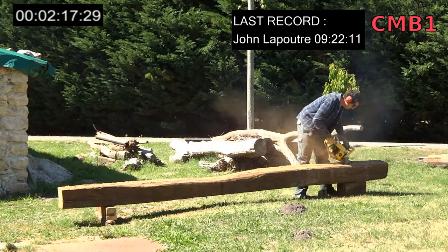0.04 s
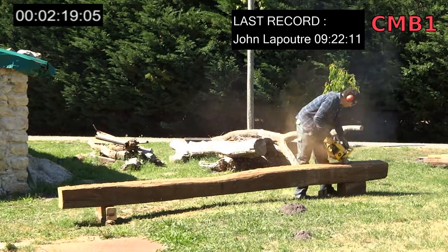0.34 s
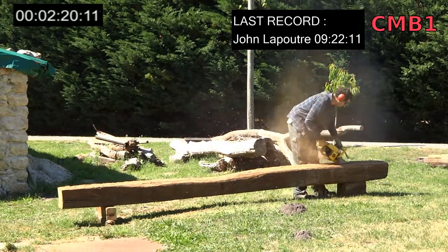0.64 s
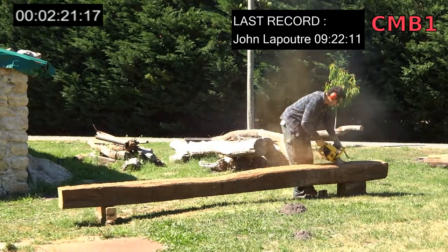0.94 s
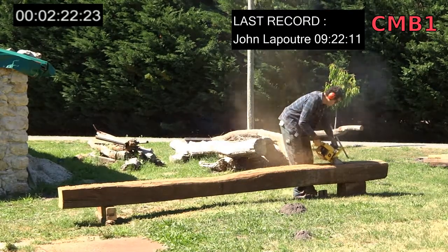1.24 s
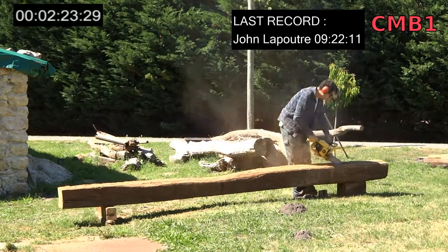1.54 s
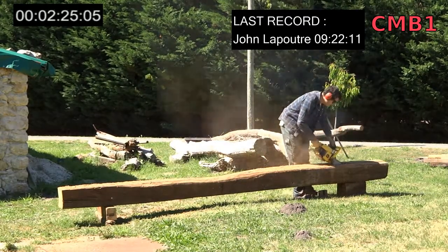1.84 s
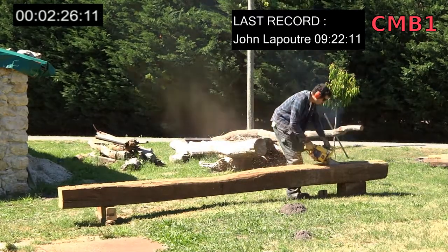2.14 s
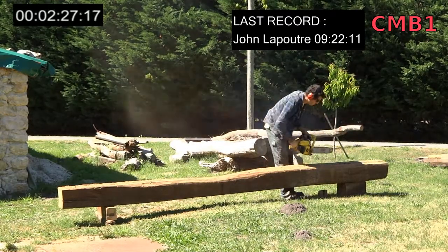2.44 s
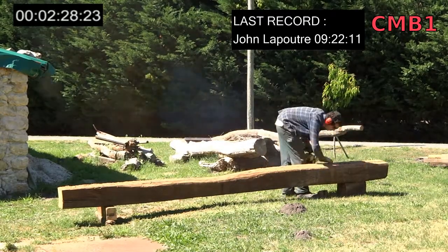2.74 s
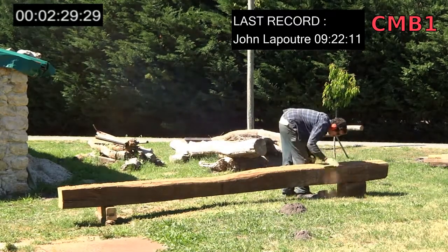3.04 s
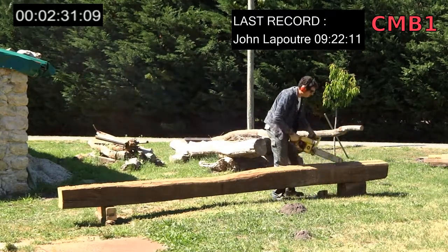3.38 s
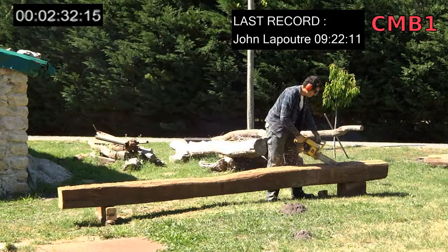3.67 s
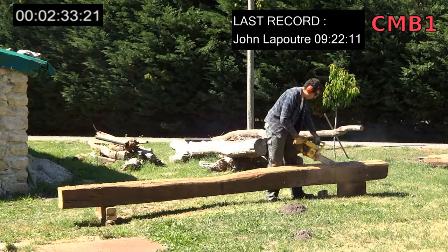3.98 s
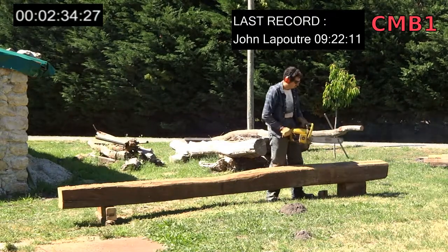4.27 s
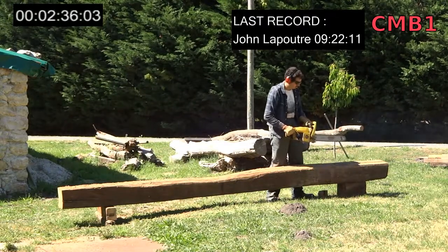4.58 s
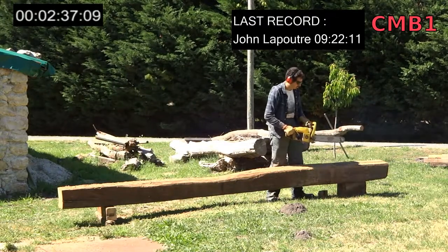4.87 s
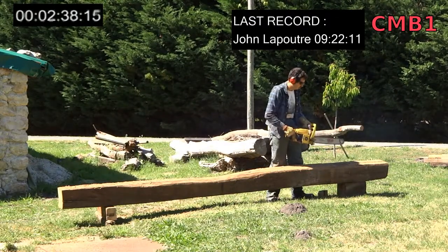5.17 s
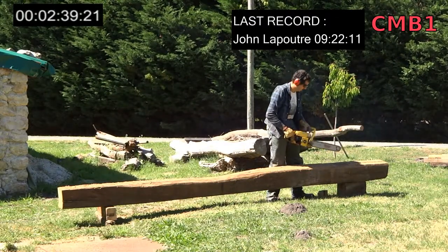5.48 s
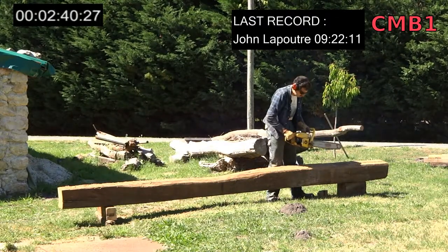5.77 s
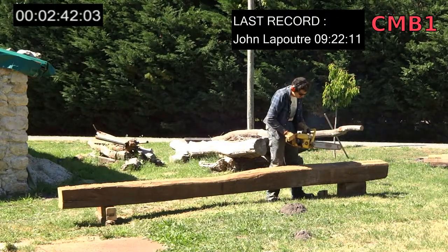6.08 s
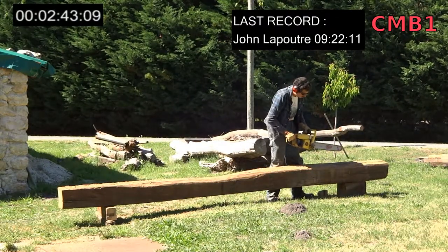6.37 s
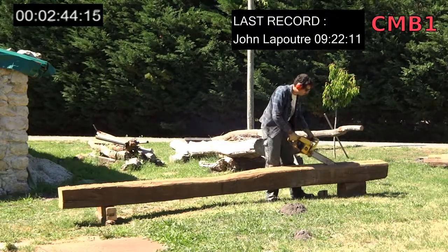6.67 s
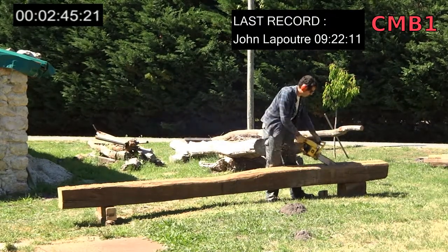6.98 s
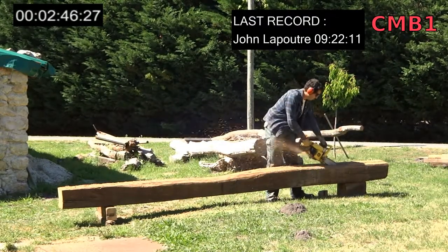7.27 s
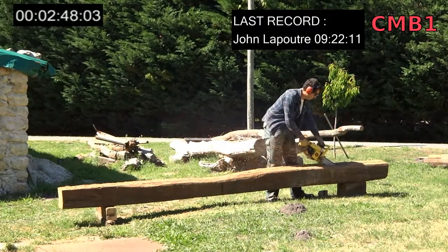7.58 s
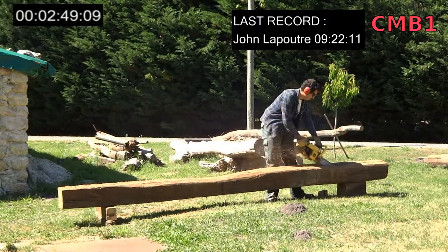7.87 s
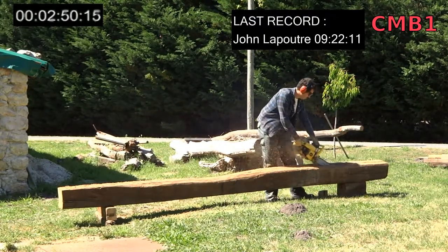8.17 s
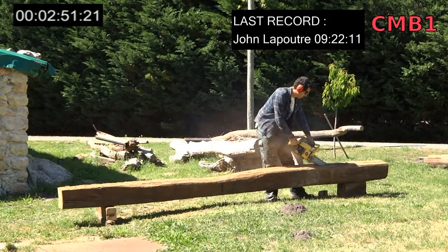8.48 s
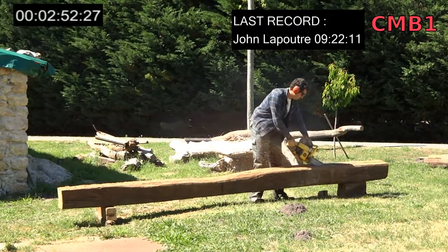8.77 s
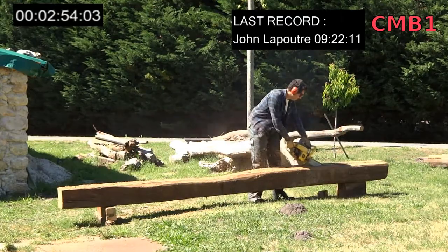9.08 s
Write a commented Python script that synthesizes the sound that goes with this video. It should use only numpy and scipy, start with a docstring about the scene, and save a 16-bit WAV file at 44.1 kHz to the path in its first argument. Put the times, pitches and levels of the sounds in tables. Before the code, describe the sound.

A small two-stroke chainsaw revs straight into a hard, high whine, sags in pitch around 1.3 seconds and climbs to a peak near 1.9. After a quick blip it rings down to a slow, stumbling putter, the chain hissing, rattling and lightly scraping a log. Several short revs come between 3.2 and 3.9 seconds, followed by a few crunching, hollow bites until 4.3. The engine sputters on slowly, blips once at 5 seconds and settles again, with more scraping around 6.5. At 6.8 it opens to full throttle, the whine dipping and rising under load. Deep, tearing bites into the wood cluster from 8.4 to 9.3 seconds, as the engine surges to its highest scream. The saw sits in the centre, outdoors, with a faint short echo and a very quiet low rumble of open air.

```python
"""A small two-stroke chainsaw revs up into a hard whine, then carves a log in blips, crawls and pulls.
One exhaust pulse a turn rings the muffler: under load it fires evenly and whines, at low speed it
stumbles and barks, and running down with the throttle shut it rings. The chain hisses round the bar
and crunches into the wood. Lawn and hedge answer faintly over a low rumble of open air."""
import sys
import numpy as np
from scipy import signal
from scipy.fft import rfft, irfft, next_fast_len
from scipy.io import wavfile
from scipy.ndimage import uniform_filter1d, minimum_filter1d, map_coordinates

SR = 44100
rng = np.random.default_rng(int(sys.argv[2]) if len(sys.argv) > 2 else 0)


def wrap_up_sound(samples):
    """Save the sound to the file named by the first command line argument, as 16-bit audio."""
    columns = np.atleast_2d(samples).T
    # keep every value between -1 and 1, then stretch to whole-number steps
    tamed = np.clip(columns, -1, 1)
    steps = np.round(tamed * 32767).astype(np.int16)
    wavfile.write(sys.argv[1], SR, steps)


N = 411188

# Teeth scraping the wood, as hard as the bar is pressed: t/s, relative level/dB
SCRAPE = [(1.95, -49), (2.4, -39.5), (3.75, -40), (3.95, -31.5), (5.3, -46), (6.55, -29.5), (6.85, -32.5),
          (7.7, -40), (7.85, -28.5)]
# The chain digs in deep: t/s, length/s, relative level/dB
DEEP_BITES = [(3.068, .03, -30.5), (3.896, 0.087, -22), (4.12, 0.05, -27.5), (4.247, 0.07, -23),
              (6.387, 0.16, -30), (7.85, 0.085, -39), (8.001, 0.17, -49), (8.445, 0.12, -19.5),
              (8.612, .068, -16.5), (8.69, 0.086, -28.5), (8.811, 0.041, -28), (8.936, 0.091, -19),
              (9.128, 0.16, -25.5), (9.303, 0.057, -24.5)]
# Colours of the chain and the wood: f/Hz, relative level/dB
HISS_EQ = [(150, -27), (1100, -5), (2500, -15), (3400, -9), (4400, -2.5), (5600, -6), (6900, 0),
           (8800, -4.5), (11300, -6.5), (13300, -2), (16000, -14)]
RATTLE_EQ = [(2000, -25), (4500, -2), (6500, -2), (7600, -18), (9000, -16), (9800, 1), (10800, -3),
             (12500, -20)]
CHIP_EQ = [(90, -36), (550, -3.5), (1400, -1), (2600, -7.5), (16000, -24)]
LOG_EQ = [(40, -36), (220, -7.5), (650, -1.5), (4000, -33)]
# Colours of the exhaust voices: f/Hz, relative level/dB
GROWL_EQ = [(100, -32), (400, -1.5), (1000, -17.5), (1520, 17), (1900, 3), (2350, 6), (3200, -25.5),
            (16000, -58)]
RING_EQ = [(150, -53), (800, 3), (1900, -2), (2700, -5), (4200, 7.5), (5600, 0), (8200, -11.5),
           (10000, -14), (16000, -27)]
CRACK_EQ = [(300, -64), (1980, -7.5), (2350, -1.5), (3400, 2), (4250, -1), (6700, -7.5), (7700, -31.5)]
BARK_EQ = [(100, -94), (300, -19.5), (600, -5.5), (1080, -2), (1500, 1), (1900, -11), (2400, -2),
           (3500, -15), (16000, -70)]
PUFF_EQ = [(100, -74), (240, -12.5), (480, -10.5), (720, 4.5), (950, 0.5), (2500, -42)]
YELP_EQ = [(100, -50), (550, 17), (1100, 17), (1550, 25.5), (2050, 22), (2800, -16), (4300, -21),
           (6200, 14.5), (16000, -80)]
WHINE_EQ = [(170, -40), (350, -0.5), (600, 6), (800, 1.5), (1400, 5), (1850, 3), (2450, -9), (2850, -0.5),
            (3350, -3), (4100, 6), (4700, 3.5), (5400, 4), (7200, -3.5), (8100, -4.5), (8900, -21.5),
            (10500, -29), (16000, -20)]
# Crank speed in two full-throttle pulls, sagging as the bar is pressed in: t/s, f/Hz
OPENING_PULL = [(.02, 316), (.075, 480), (.14, 572), (.42, 583), (.48, 648), (.58, 590), (.7, 532),
                (.81, 463), (.89, 466), (1.04, 424), (1.19, 376), (1.28, 365), (1.38, 351), (1.47, 384),
                (1.59, 458), (1.705, 432), (1.8, 578), (1.858, 660)]
CLOSING_PULL = [(6.748, 240.3), (6.778, 261.1), (6.812, 266.4), (6.96, 531.4), (7.056, 630.8), (7.097, 592),
                (7.18, 617.5), (7.42, 408.5), (7.53, 451), (7.67, 458.5), (7.82, 381.3), (7.99, 354.1),
                (8.221, 408.2), (8.32, 393), (8.41, 460.4), (8.565, 421.7), (8.706, 545.7), (8.82, 422.2),
                (8.935, 360.8), (9.228, 717.5), (9.324, 684)]
# Crank speed in three slow crawls off the throttle, a list for each: t/s, f/Hz
SLOW_CRAWLS = [
    [(2.27, 225.8), (2.599, 233.0), (2.87, 255.1), (3.24, 268.2)],
    [(3.952, 230.5), (4.996, 231.3)],
    [(5.17, 328), (5.3, 289), (5.45, 254), (5.7, 242), (6.0, 245), (6.6, 243), (6.72, 233)],
]
# Throttle blips: start t/s, end t/s, from f/Hz, to f/Hz, bend (above 0 = fast at first), opening 0-1
THROTTLE_BLIPS = [(1.936, 2.123, 286.6, 528.4, -1.5, 0.97), (3.241, 3.268, 263.9, 330.7, 0.18, 0.67),
                  (3.355, 3.422, 320, 340.3, 5.5, 0), (3.481, 3.575, 264.9, 471.3, -0.42, 0.87),
                  (3.618, 3.854, 324.2, 481, 2.5, 1), (5.0, 5.073, 243.9, 408, -2.5, 0.93)]
# How far the exhaust is turned away: t/s, share 0-1
EXHAUST_AWAY = [(1.9, 0.06), (2.68, 0.2), (2.78, 0.68), (3.12, 0.99), (3.2, 0.08), (3.95, 0.27),
                (4.35, 0.09)]

COAST_S, THROTTLE_S = .1, .019  # time constant of the run-down; travel time of the throttle
WAVER, FLUTTER, LOAD_WAVER = .0022, .003, .003  # speed drift as shares: slow, fast, under load
CATCH_HZ, CATCH_WIDTH_HZ = 288, 83  # throttle open: yelp below this speed, whine above
STUMBLE_HZ, STUMBLE_WIDTH_HZ = 325, 27  # the engine stumbles below this speed
STRAY_HZ, STRAY_DB = 352, -2.5  # stray firings still bark up to this speed
RING_HZ, RING_WIDTH_HZ = 296, 4.2  # running down, the muffler rings until this speed
REFIRE_S = .021  # running down, firing picks up this late
LUG_HZ, LUG_JITTER_S, LUG_POWER = 360, 1.2e-5, 2.5  # the whine's timing scatter shrinks above this speed
SCREAM_HZ, SCREAM_WIDTH_HZ, SCREAM_DB = 520, 360, -3  # orders 7 and 9 scream above this speed
HOUSING_HZ, HOUSING_WIDTH_HZ, HOUSING_DB = 4200, 330, 5.5  # resonance of the housing
TEAR_HZ, TEAR_WIDTH_HZ = 310, 22  # above this speed a bite tears more than it thumps
# Faders, then their trims with the exhaust turned fully away or the throttle open
WHINE_DB, YELP_DB, RING_DB, BARK_DB, CRACK_DB = -20, -25.5, -19, -24, -19.5
GROWL_DB, SING_DB, CHAIN_DB, RATTLE_DB = -23, -38, -30.5, -34
AWAY_CRACK_DB, AWAY_CHAIN_DB, AWAY_SING_DB, OPEN_CRACK_DB = -30.5, -3, -10, -6.5
INPUT_DB, CEILING, HOLD_S, EASE_S, TOP_HZ = 1.5, .55, .009, .02, 15850  # limiter and high cut


def amp(db):
    """Decibels as a gain."""
    return 10 ** (np.asarray(db) / 20)


def unit(x):
    """x at rms 1."""
    return x / np.sqrt(np.mean(x ** 2) + 1e-20)


def curve(rows):
    """Breakpoints (t/s, value) as one value per sample."""
    return np.interp(np.arange(N) / SR, *np.transpose(rows))


def wobble(rate):
    """Smooth random modulation, rate knots a second."""
    knots = rng.standard_normal(int(N * rate / SR) + 4)
    return map_coordinates(knots, [np.arange(N) * rate / SR], order=2)


def swell(centre_s, length_s):
    """An envelope with a sharp rise, a flat top and a softer fall."""
    u = 2 * (np.arange(N) / SR - centre_s) / length_s
    return np.exp(-.5 * np.where(u < 0, (u * u) ** 6, (u * u) ** 2))


def glide(rows, t):
    """A smooth line through (t/s, value) rows that levels off at each turning point."""
    s, v = np.transpose(sorted(map(tuple, rows)))
    rate = np.pad(np.diff(v) / (np.diff(s) + 1e-9), 1, mode="edge")
    slope = 2 * np.maximum(rate[:-1] * rate[1:], 0) / (rate[:-1] + rate[1:] + 1e-9)
    k = np.clip(np.searchsorted(s, t) - 1, 0, len(s) - 2)
    step = s[k + 1] - s[k] + 1e-9
    u = np.clip((t - s[k]) / step, 0, 1)
    ease = u * u * (1 + 2 * (1 - u))
    bow = step * u * (1 - u) * ((1 - u) * slope[k] - u * slope[k + 1])
    return v[k] + (v[k + 1] - v[k]) * ease + bow


def approach(t, start, end, first, last, bend):
    """An exponential run from first to last between two times."""
    u = np.clip((t - start) / (end - start), 0, 1)
    return first + (last - first) * np.expm1(-bend * u) / np.expm1(-bend)


def crossfade(speed, centre_hz, width_hz):
    """Equal-power gains for what sounds below and above a speed."""
    above = .5 + .5 * np.tanh((speed - centre_hz) / (2 * width_hz))
    return np.sqrt(1 - above), np.sqrt(above)


def coloured(x, eq, size=4096):
    """x through a minimum-phase EQ of unit energy, drawn as (f/Hz, level/dB) points."""
    hz, db = np.transpose(eq)
    grid = np.fft.rfftfreq(size, 1 / SR)
    response = amp(np.interp(np.log(grid + 1), np.log(hz), db))
    cepstrum = irfft(np.log(response))
    cepstrum[1:size // 2] *= 2
    cepstrum[size // 2 + 1:] = 0
    ring = irfft(np.exp(rfft(cepstrum)))
    return signal.oaconvolve(x, ring / np.linalg.norm(ring))[:N]


def pulses(times, sizes, count=8):
    """Band-limited impulses at times (s) that fall between samples."""
    at = times[:, None] * SR
    taps = np.floor(at).astype(int) + np.arange(1 - count, count + 1)
    shape = np.sinc(taps - at) * np.cos(np.pi * (taps - at) / (2 * count)) ** 2
    return np.bincount(np.clip(taps, 0, N).ravel(), (shape * sizes[:, None]).ravel(), N + 1)[:N]


def breeze():
    """A faint stereo bed of open-air rumble, growing slowly."""
    level = amp(np.linspace(-71, -60, N) + 4 * wobble(8.5))
    shared, left, right = [coloured(rng.standard_normal(N), [(75, 2), (300, -69)]) for _ in range(3)]
    return level * (shared + np.array([left, right]))


def hedge_echo(x, t60):
    """Ground and hedge scatter the sound into a short, diffuse tail."""
    t = np.arange(SR // 2) / SR
    tail = rng.standard_normal(len(t)) * amp(-60 * t / t60)
    return signal.oaconvolve(x, tail / np.linalg.norm(tail))[:N]


def off_the_log(x, throttle, share, path_s):
    """x plus its bounce off the log: the path shifts as the saw sweeps, flanging the harmonics."""
    n = np.arange(N)
    sweep = .16 * throttle * wobble(10) + .012 * wobble(5)
    return x + share * np.interp(n - SR * path_s * (1 + sweep), n, x)


def chain_rattle(turns, throttle, away):
    """Off the throttle, the slack chain slaps the bar in time with the crank."""
    level = amp(RATTLE_DB - 11 * away + 1.8 * wobble(11)) * (1 - throttle)
    slap = 1 + .37 * np.cos(2 * np.pi * turns)
    return level * slap * coloured(rng.standard_normal(N), RATTLE_EQ)


def chain_hiss(turns, away, width):
    """Links hiss along the bar in stereo, throbbing a little with the crank."""
    level = amp(CHAIN_DB + AWAY_CHAIN_DB * away + 2.3 * wobble(14))
    throb = 1 + .13 * np.cos(2 * np.pi * turns)
    mid, side = [level * throb * coloured(rng.standard_normal(N), HISS_EQ) for _ in range(2)]
    return np.array([mid + width * side, mid - width * side])


def chips(eq, spike_db, per_second=3500):
    """Teeth tear off chips at random: dense clicks of very uneven size."""
    clicks = (rng.random(N) < per_second / SR) * rng.standard_normal(N)
    return unit(coloured(clicks * amp(spike_db * wobble(160)), eq))


def cutting(speed):
    """A running scrape with deep bites: a slow chain thumps the log, a fast one tears it."""
    slow, fast = crossfade(speed, TEAR_HZ, TEAR_WIDTH_HZ)
    scrape = amp(curve(SCRAPE))
    bite = np.sqrt(sum((amp(db) * swell(s, length)) ** 2 for s, length, db in DEEP_BITES))
    tearing = np.hypot(amp(-3) * scrape, fast * bite) * chips(CHIP_EQ, spike_db=1.8)
    hollow = np.hypot(amp(-1.5) * scrape, slow * bite) * chips(LOG_EQ, spike_db=2.5)
    return (tearing + hollow) * amp(wobble(16))  # the pressure on the bar is never steady


def drive():
    """Crank speed (Hz) and throttle (0-1): pulls, blips and crawls, coasting from each to the next."""
    t = np.arange(N) / SR
    moves = [(rows[0][0], rows[-1][0], glide(rows, t), 1) for rows in (OPENING_PULL, CLOSING_PULL)]
    moves += [(rows[0][0], rows[-1][0], glide(rows, t), 0) for rows in SLOW_CRAWLS]
    moves += [(start, end, approach(t, start, end, *run), opening)
              for start, end, *run, opening in THROTTLE_BLIPS]
    moves.sort(key=lambda move: move[0])
    _, shut, speed, throttle = moves[0]
    for start, end, run, opening in moves[1:]:
        coast = approach(t, shut, start, speed[-1], run[0], (start - shut) / COAST_S)
        speed = np.select([t < shut, t < start], [speed, coast], run)
        throttle = np.select([t < shut, t < start], [throttle, 0.], opening)
        shut = end
    throttle = uniform_filter1d(np.clip(throttle, 0, 1), int(THROTTLE_S * SR))
    drift = WAVER * wobble(40) + FLUTTER * wobble(130) + LOAD_WAVER * throttle * wobble(17)
    return speed * (1 + drift), throttle


def misfires(count, refill, scatter):
    """Fresh mixture builds up turn by turn; the cylinder misses (1) until there is enough."""
    charge = np.cumsum(np.clip(refill + scatter * rng.standard_normal(count), 0, 1))
    return 1 - np.diff(np.floor(charge), prepend=0)


def exhaust(beats, jitter_s, scatter_db, strength=1, late_s=0):
    """One pulse a turn, uneven in time and size; beats holds the turns' times and speeds."""
    times, turn_hz = beats
    size = np.sqrt(SR / turn_hz)  # equal power at every speed
    timing, level = rng.standard_normal((2, len(times)))
    return pulses(times + late_s + jitter_s * timing, size * strength * amp(scatter_db * level))


def harmonics(speed, turns, orders):
    """Chosen orders of an even pulse train."""
    return 2 * np.sqrt(speed / SR) * sum(np.cos(2 * np.pi * order * turns) for order in orders)


def chamber(x, trip_s, bounce):
    """Pulses bounce to and fro in a cavity: smeared in time, unchanged in colour."""
    size = next_fast_len(N + SR // 10)
    trip = np.exp(-2j * np.pi * np.fft.rfftfreq(size, 1 / SR) * trip_s)
    return irfft(rfft(x, size) * (trip - bounce) / (1 - bounce * trip), size)[:N]


def singing(speed, turns, orders=(15, 17, 18, 20)):
    """High orders sing through the rasp, each wavering and louder where it meets the housing's ring."""
    song = np.zeros(N)
    for order in orders:
        housing_db = HOUSING_DB * np.exp(-((order * speed - HOUSING_HZ) / HOUSING_WIDTH_HZ) ** 2)
        level = amp(SING_DB + housing_db + 2 * wobble(20))
        song += level * np.cos(2 * np.pi * order * turns + .5 * wobble(90))
    return song


def growl(beats, missed):
    """From behind, the pulses are dark and evenly spaced; the fired ones stand out."""
    return coloured(exhaust(beats, jitter_s=1.2e-5, scatter_db=.4, strength=1.3 - .6 * missed), GROWL_EQ)


def muffler_ring(beats, speed, turns):
    """Running down, the muffler rings and a few high orders glide over it."""
    gliding = .9 * harmonics(speed, turns, (9, 12, 14, 17))
    ring = coloured(exhaust(beats, jitter_s=1.6e-5, scatter_db=1) + gliding, RING_EQ)
    return chamber(ring, trip_s=.00045, bounce=.35)


def crack(beats, missed):
    """The bright edge of a stumble spreads in the port and rebounds from the muffler's far wall."""
    snaps = exhaust(beats, jitter_s=4e-5, scatter_db=1, strength=1.15 - .44 * missed)
    port = chamber(coloured(snaps, CRACK_EQ), trip_s=.0001598, bounce=.71)
    return chamber(port, trip_s=.0013, bounce=.79)


def bark(beats, missed):
    """The body of a stumble: misfires come weak and late; the piston puffs on every turn."""
    barks = exhaust(beats, jitter_s=3e-5, scatter_db=2.6,
                    strength=1.2 - .5 * missed, late_s=.00029 * missed)
    puffs = exhaust(beats, jitter_s=1e-5, scatter_db=.52)
    body = coloured(barks, BARK_EQ) + amp(-11) * coloured(puffs, PUFF_EQ)
    return chamber(body, trip_s=.000755, bounce=.37)


def yelp(beats):
    """At low speed an open throttle evens out the firing into a hollow yelp."""
    return coloured(exhaust(beats, jitter_s=9e-6, scatter_db=.26), YELP_EQ)


def whine(beats, speed, turns):
    """Under load every turn fires: ragged when dragged down, screaming at high revs."""
    _, turn_hz = beats
    jitter_s = LUG_JITTER_S * (LUG_HZ / np.maximum(turn_hz, LUG_HZ)) ** LUG_POWER
    firing = exhaust(beats, jitter_s, scatter_db=.5)
    # the muffler cancels the third order in the middle of the speed range
    third = 1.26 * np.exp(-((speed - 440) / 85) ** 2) * harmonics(speed, turns, (3,))
    racing = crossfade(speed, SCREAM_HZ, SCREAM_WIDTH_HZ)[1]
    scream = amp(SCREAM_DB) * racing * harmonics(speed, turns, (7, 9))
    tone = coloured(firing - third + scream, WHINE_EQ)
    # faster turns make steeper pulses, so the top end grows with speed
    top = signal.sosfiltfilt(signal.butter(2, 4000, "high", fs=SR, output="sos"), tone)
    return tone + .5 * (speed / 450 - 1) * top


def engine(speed, turns, throttle, away):
    """The two-stroke's exhaust voices, blended by throttle, speed and the way it faces."""
    t = np.arange(N) / SR
    times = np.interp(np.arange(1, int(turns[-1])), turns, t)
    beats = times, np.interp(times, t, speed)
    missed = misfires(len(times), refill=.43, scatter=.15)
    opened, shut = np.sqrt(np.clip([throttle, 1 - throttle], 0, 1))
    lugging, caught = crossfade(speed, CATCH_HZ, CATCH_WIDTH_HZ)
    recent_hz = np.maximum(speed, np.interp(t - REFIRE_S, t, speed))
    stumbling = crossfade(recent_hz, STUMBLE_HZ, STUMBLE_WIDTH_HZ)[0]
    stray = amp(STRAY_DB) * crossfade(recent_hz, STRAY_HZ, STUMBLE_WIDTH_HZ)[0]
    barking = shut * np.maximum(stumbling, stray)
    cracking = np.hypot(shut, amp(OPEN_CRACK_DB) * opened) * stumbling
    coasting = shut * crossfade(recent_hz, RING_HZ, RING_WIDTH_HZ)[1]
    crawling = shut * crossfade(speed, RING_HZ, RING_WIDTH_HZ)[0]
    facing = amp(AWAY_CRACK_DB * away)
    return (amp(WHINE_DB) * opened * caught * whine(beats, speed, turns)
            + amp(BARK_DB - 2.1 * away) * barking * bark(beats, missed)
            + amp(CRACK_DB) * cracking * facing * crack(beats, missed)
            + amp(YELP_DB) * opened * lugging * yelp(beats)
            + amp(RING_DB) * coasting * np.sqrt(facing) * muffler_ring(beats, speed, turns)
            + amp(AWAY_SING_DB * away) * crawling * singing(speed, turns)
            + amp(GROWL_DB) * barking * np.sqrt(away) * growl(beats, missed))


def scene():
    """Saw and log in the centre; echo, chain hiss and open air spread around them."""
    speed, throttle = drive()
    turns = np.cumsum(speed) / SR
    away = np.clip(curve(EXHAUST_AWAY), 0, 1)
    saw = off_the_log(engine(speed, turns, throttle, away), throttle, share=.27, path_s=.000954)
    saw += chain_rattle(turns, throttle, away)
    wood = cutting(speed)
    side = amp(-12.5) * hedge_echo(saw + 1.5 * wood, t60=.2)  # the long log sounds wider than the saw
    return saw + wood + np.array([side, -side]) + chain_hiss(turns, away, width=.58) + breeze()


def record(dry):
    """A limiter rides the peaks, so a deep bite ducks the engine; a steep high cut follows."""
    loud = amp(INPUT_DB) * dry
    needed = CEILING / np.maximum(np.abs(loud).max(axis=0), CEILING)
    held = minimum_filter1d(needed, int(HOLD_S * SR))
    gain = uniform_filter1d(held, int(EASE_S * SR))
    size = next_fast_len(N + SR // 2)
    passband = np.fft.rfftfreq(size, 1 / SR) < TOP_HZ
    return irfft(rfft(loud * gain, size) * passband, size)[:, :N]


dry = scene()
out = record(dry)
wrap_up_sound(out)
```